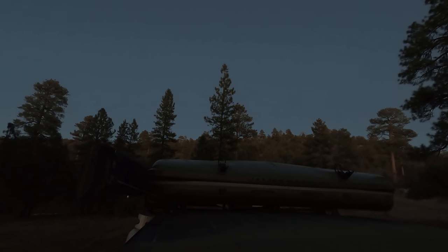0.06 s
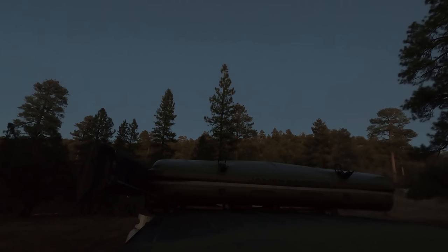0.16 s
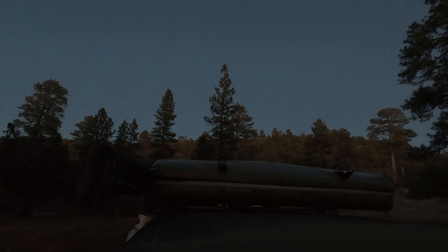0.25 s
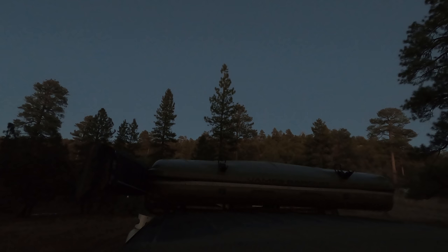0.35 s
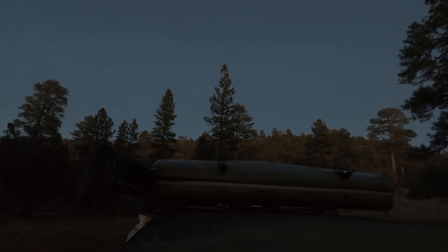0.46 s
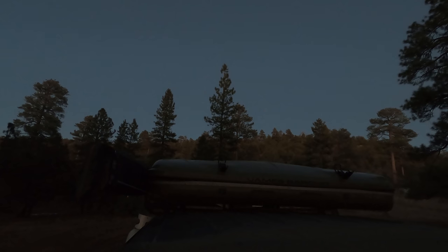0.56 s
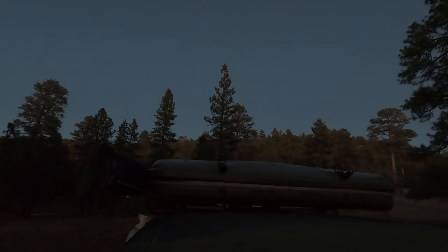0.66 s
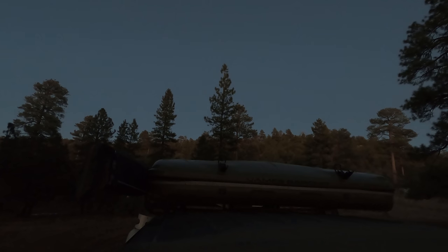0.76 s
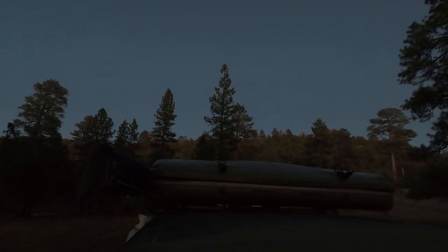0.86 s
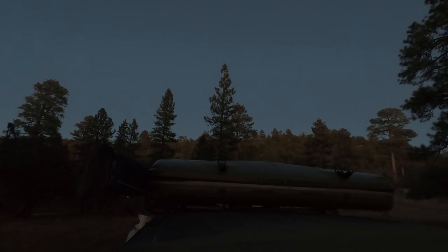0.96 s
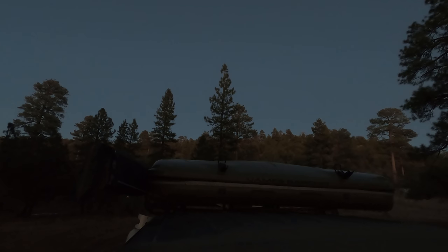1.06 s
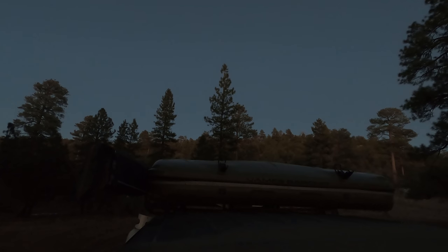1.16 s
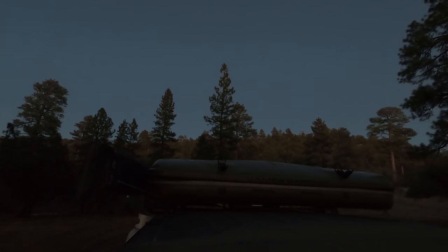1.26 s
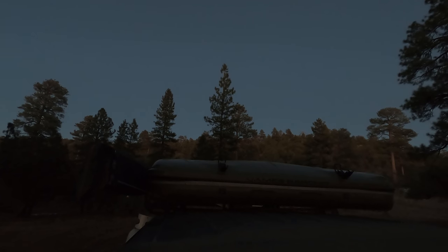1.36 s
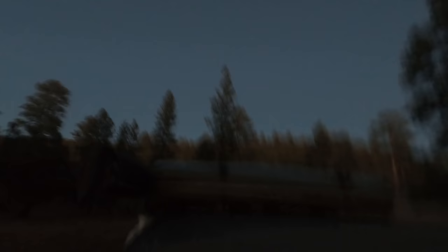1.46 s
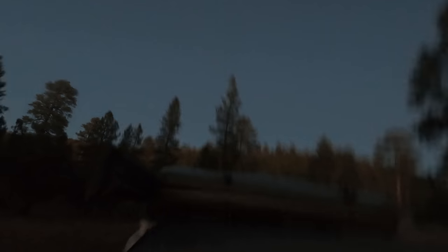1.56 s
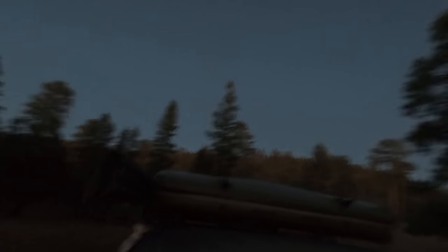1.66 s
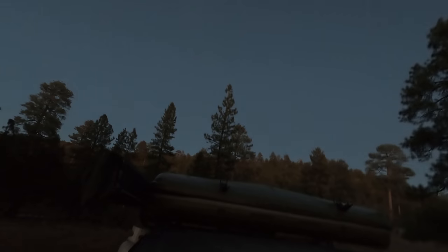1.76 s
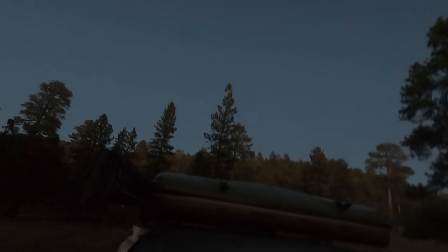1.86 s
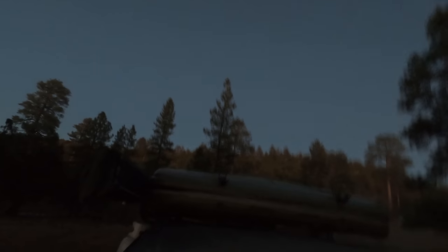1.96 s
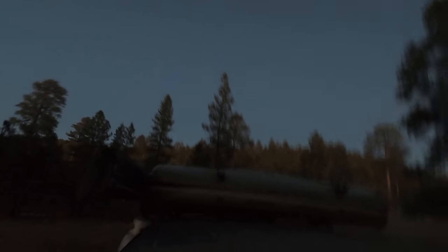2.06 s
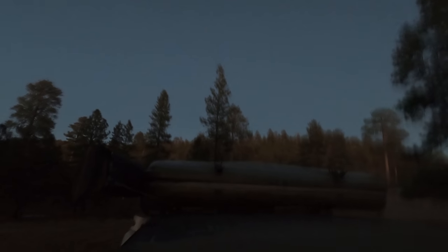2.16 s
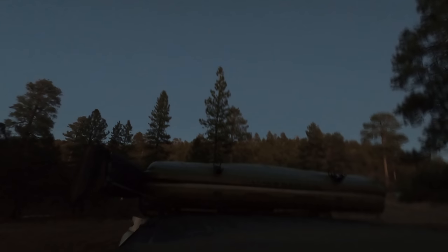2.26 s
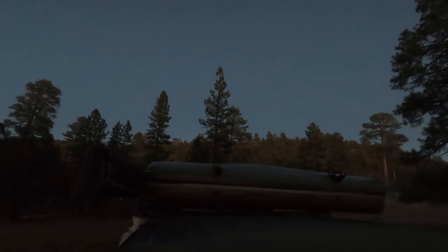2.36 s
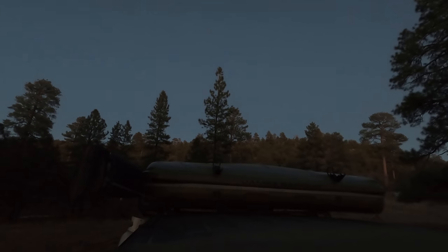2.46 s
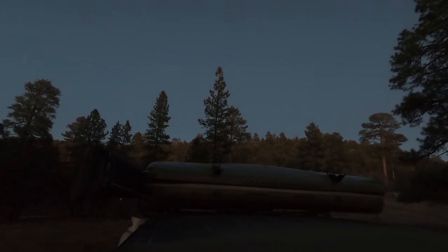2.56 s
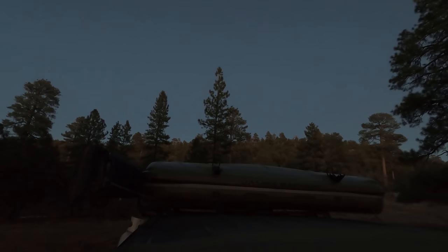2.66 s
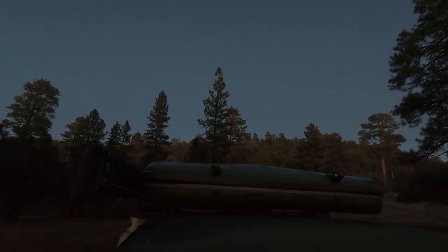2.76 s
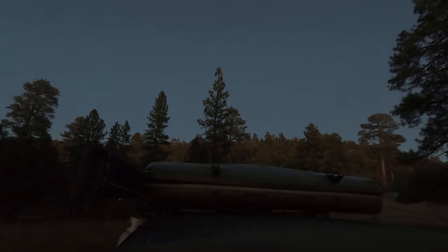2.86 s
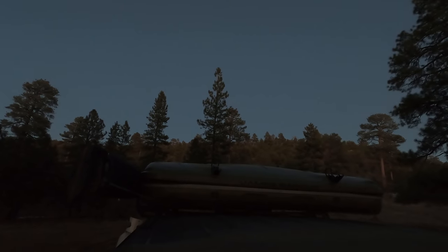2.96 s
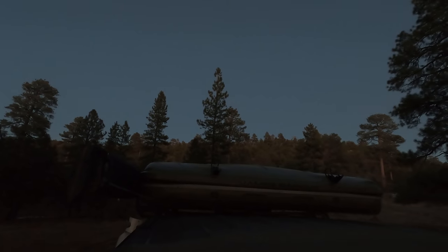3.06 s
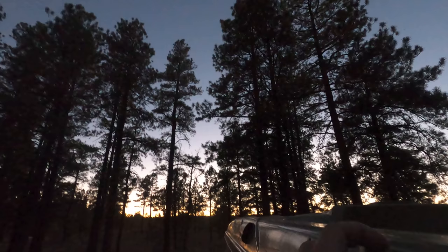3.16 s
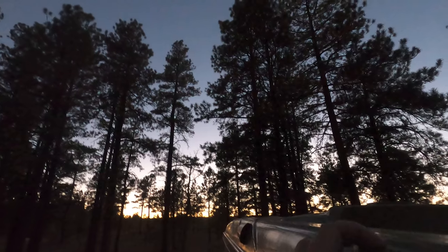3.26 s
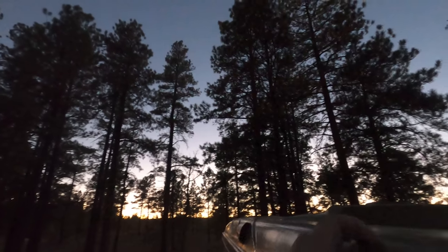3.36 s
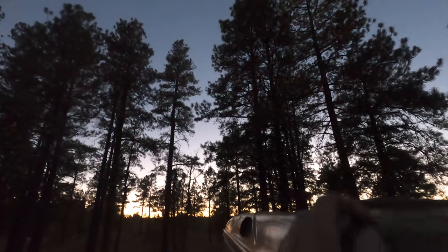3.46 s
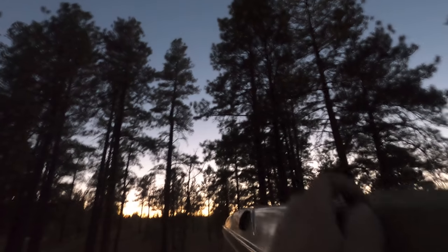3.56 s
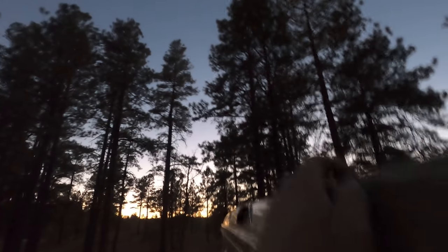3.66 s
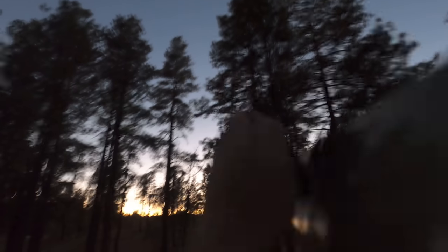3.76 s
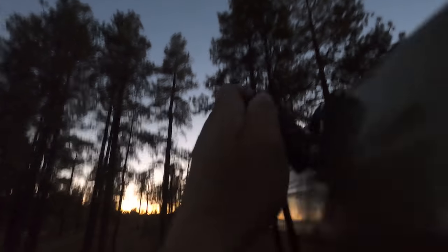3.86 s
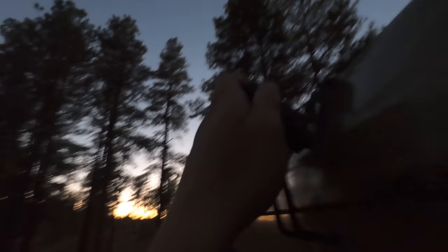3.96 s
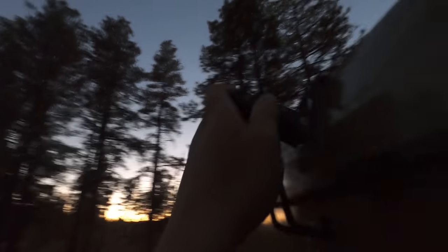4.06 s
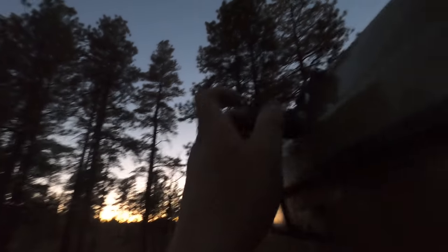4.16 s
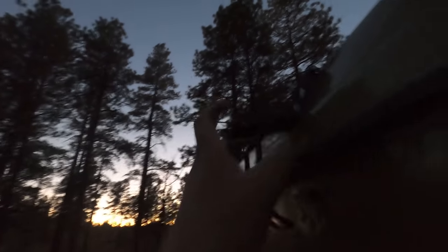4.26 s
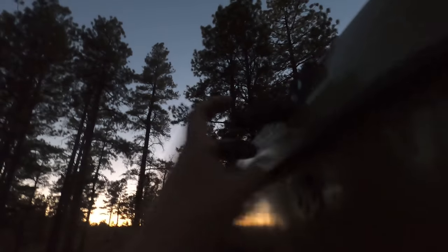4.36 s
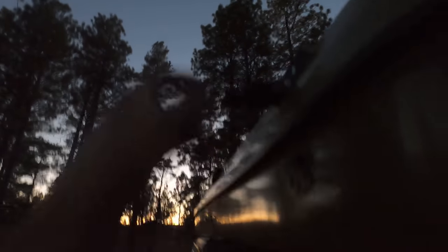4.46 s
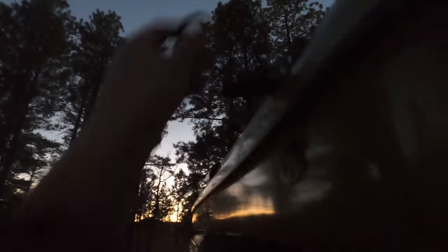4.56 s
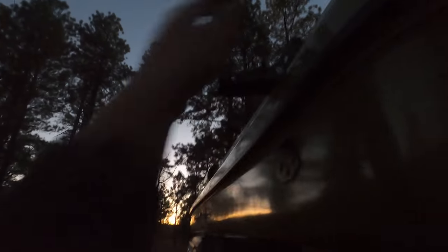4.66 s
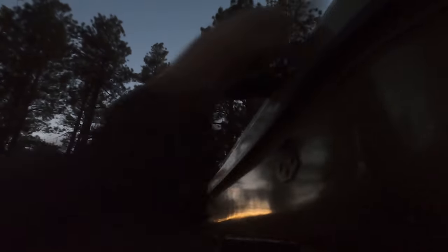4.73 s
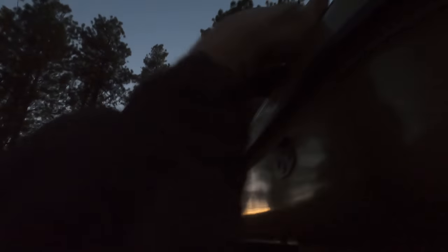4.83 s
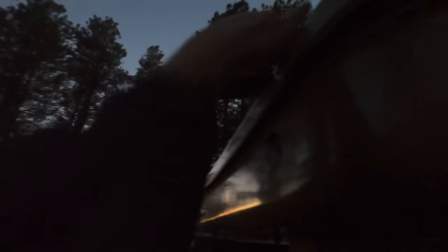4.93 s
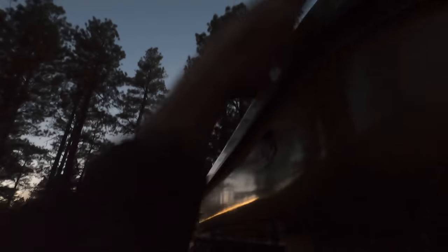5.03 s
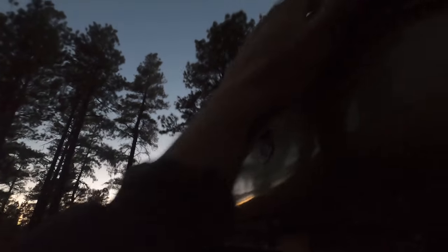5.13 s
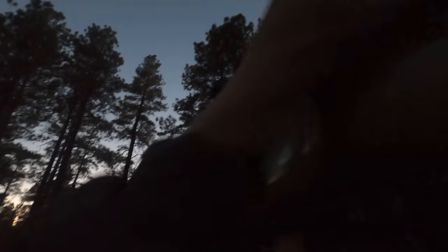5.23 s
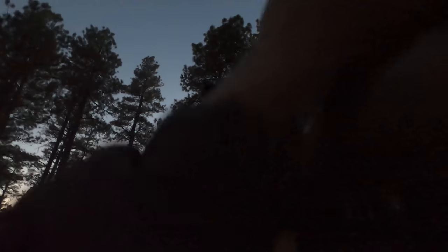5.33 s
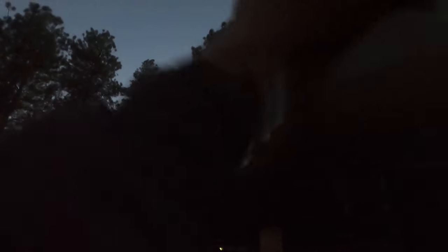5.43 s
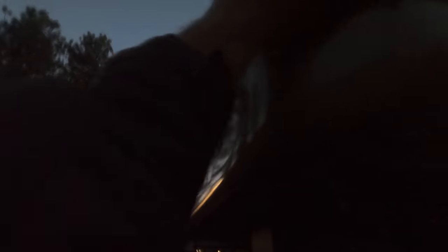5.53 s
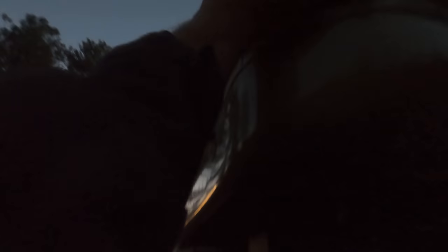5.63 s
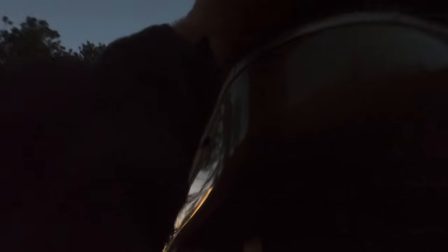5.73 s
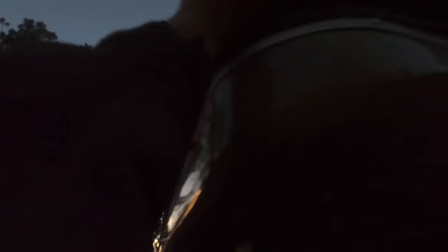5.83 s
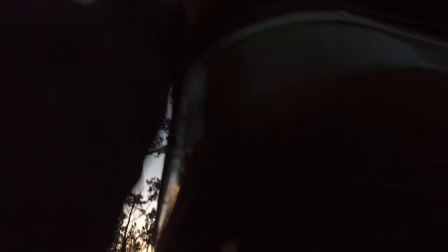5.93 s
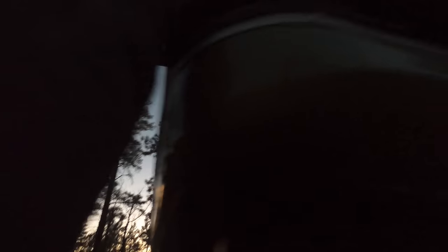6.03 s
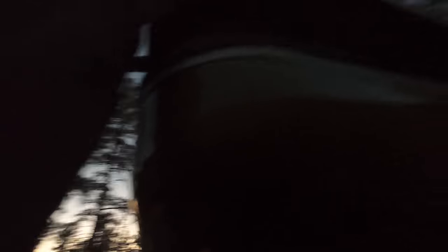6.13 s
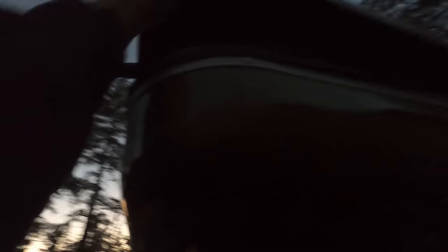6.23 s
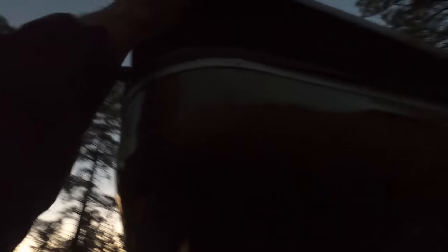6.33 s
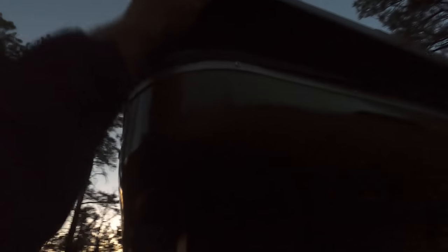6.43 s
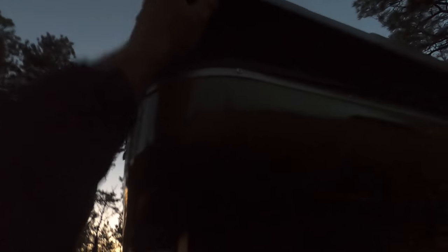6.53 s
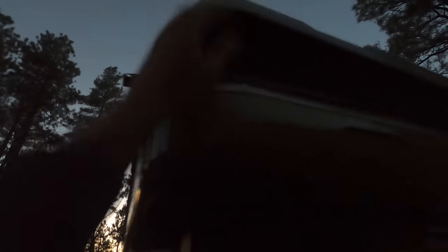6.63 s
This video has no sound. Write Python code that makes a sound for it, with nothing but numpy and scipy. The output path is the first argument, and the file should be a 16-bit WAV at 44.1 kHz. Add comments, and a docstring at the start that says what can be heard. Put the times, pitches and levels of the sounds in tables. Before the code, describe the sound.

First a parked car in a hushed open place: small clicks, a faint soft thud, one big boomy slam that shakes the body, then a few hollow sheet-metal knocks. After a short pause the hand-held microphone is right beside a rooftop tent: dull latch clacks, damped strap twangs, clinking buckles and a bright hard snap, then dry cover cracks, rustling sleeves and low thumps.

```python
"""Car and rooftop tent in a quiet forest

Two scenes. First, by a parked car in faint forest air: filtered noise bursts and damped rings make
a heavy thunk, clanks and knocks. After a moment's silence, hand-held, close and nearly mono by the tent:
cracks with metal rings make a latch and buckles, damped twangs a strap creaking, and grainy noise
the hands and sleeves that rub, stutter and bump along the cover; bright hiss swells briefly."""
import sys
import numpy as np
from scipy import signal
from scipy.fft import rfft, irfft
from scipy.io import wavfile

SR = 44100
rng = np.random.default_rng(int(sys.argv[2]) if len(sys.argv) > 2 else 0)


def generate_wav(sig):
    """Save sig (samples, or channels by samples) to the path in sys.argv[1] as 16-bit PCM at SR."""
    pcm = np.round(np.clip(np.atleast_2d(sig).T, -1, 1) * 32767).astype(np.int16)
    wavfile.write(sys.argv[1], SR, pcm)


N = 295029  # length [samples]
EDGE_HZ = 15900  # upper limit of the sound


def amp(db):
    """Decibels to a linear factor."""
    return 10 ** (np.asarray(db) / 20)


def unit(x):
    """Scales to an rms of 1."""
    return x / np.sqrt(np.mean(x ** 2) + 1e-20)


def peaked(x):
    """Scales to a peak of 1."""
    return x / (abs(x).max() + 1e-12)


def seconds(length):
    """A time axis [s] that starts at 0."""
    return np.arange(round(length * SR)) / SR


def read(points, hz):
    """Reads a table joined by straight lines on a log-frequency axis."""
    f, value = np.transpose(points)
    return np.interp(np.log(hz + 1), np.log(f + 1), value)


def add(mix, s, sound):
    """Adds a sound at s seconds, cut off where the mix ends."""
    part = mix[..., round(s * SR):][..., :sound.shape[-1]]
    part += sound[..., :part.shape[-1]]


def colour(x, points, tilt_db=0):
    """Filters by a spectrum; well above 100 Hz the tilt is in dB per octave."""
    hz = np.fft.rfftfreq(x.shape[-1], 1 / SR)
    gain = amp(read(points, hz) + tilt_db * np.log2(hz / 100 + 1))
    return irfft(rfft(x) * gain, x.shape[-1])


def noise_pair(size, same=.7):
    """Two channels of noise that share part of their power."""
    common, left, right = rng.standard_normal((3, size))
    same = np.clip(same, 0, 1)
    return np.sqrt(same) * common + np.sqrt(1 - same) * np.array([left, right])


def wander(rate):
    """Random values, rate per second, joined by straight lines."""
    at = np.arange(N) * rate / SR
    return np.interp(at, np.arange(N), rng.standard_normal(N))


def swell(start, length, attack, release):
    """Rises to start, holds for length, dies away; attack and release are times for 60 dB."""
    t = np.arange(N) / SR
    before = np.maximum(start - t, 0)
    after = np.maximum(t - start - length, 0)
    return amp(-60 * (before / attack + after / release))


def die_away(x, decays, hold=0, rise=0.00062):
    """A soft start and a hold, then each band fades with its own t60."""
    t, hz = np.arange(x.shape[-1]) / SR, np.fft.rfftfreq(x.shape[-1], 1 / SR)
    centres, t60s = np.transpose(decays)
    spectrum, age = rfft(x), np.maximum(t - hold, 0)
    faded = 0
    for row, t60 in zip(np.eye(len(centres)), t60s):
        share = read(np.c_[centres, row], hz)  # overlapping bands that add up to the whole
        faded = faded + irfft(spectrum * share, len(t)) * amp(-60 * age / t60)
    return np.tanh(t / rise) ** 2 * faded


def ring(t, hz, t60):
    """A sine that fades by 60 dB in t60 seconds."""
    return np.sin(2 * np.pi * hz * t) * np.exp(-np.log(1000) * t / t60)


def struck(hits, modes):
    """Each blow rings the same modes, with other strengths in each channel."""
    out, t = np.zeros((2, N)), seconds(0.81)
    rings = np.array([(-1) ** k * amp(db) * ring(t, hz, t60) for k, (hz, db, t60) in enumerate(modes)])
    for s, db in hits:
        strengths = 1 + .35 * rng.standard_normal((2, len(modes)))
        add(out, s, amp(db) * peaked(strengths @ rings))
    return out


# Spectrum of a hard contact: (frequency [Hz], level [dB])
CRACK_COLOUR = [(300, -13), (1400, -2.5), (3300, 4), (6000, -6), (8300, -5.5), (9300, -16), (11300, -23.5),
                (12200, -15), (14000, -31.5)]


def crack(treble_db, chatter, loose=0.011, loose_db=-22, rise=0.00016):
    """Two hard surfaces meet and chatter: noise with a quick decay over a weak slower one."""
    t = seconds(.5)
    # a treble cut doubles by the upper edge, a boost stays level
    treble = [(5500, 0), (7500, treble_db), (EDGE_HZ, min(treble_db, 2 * treble_db))]
    contact = colour(colour(rng.standard_normal(len(t)), CRACK_COLOUR), treble)
    decay = np.exp(-t / chatter) + amp(loose_db) * np.exp(-t / loose)
    return peaked(contact * decay * (1 - np.exp(-t / rise)))


def dry_cracks(hits, chatter):
    """Contacts that leave no ring."""
    out = np.zeros(N)
    for s, db, treble_db in hits:
        add(out, s, amp(db) * crack(treble_db, chatter))
    return out


def hardware(hits, modes, ring_db, t60, ping_db, ping_hz=8263, ping_t60=0.45):
    """Each contact cracks and rings the metal, a little differently each time; a thin ping stays on."""
    out, t = np.zeros(N), seconds(.5)
    for s, db, treble_db in hits:
        body = np.zeros(len(t))
        for k, (hz, level) in enumerate(modes):
            mode_db = level + treble_db * (hz > 6000) + 2 * rng.standard_normal()
            body += amp(mode_db) * (-1) ** k * ring(t, hz, t60)
        ping = amp(ping_db) * ring(t, ping_hz, ping_t60)
        add(out, s, amp(db) * (crack(treble_db, chatter=0.0028) + amp(ring_db) * peaked(body) + ping))
    return out


def grainy_noise(spectrum, grains_per_s, smooth):
    """Sparse grains of uneven size over smooth noise, filtered: the sound of rough surfaces sliding."""
    grains = (rng.random(N) < grains_per_s / SR) * rng.choice([-1, 1], N) * rng.random(N) ** 2
    return unit(colour(unit(grains) + smooth * rng.standard_normal(N), spectrum))


def catches(low_hz, high_hz, cycles, count):
    """Scattered catches of uneven size, each a short ring at a pitch of its own."""
    out, t = np.zeros(N), seconds(.02)
    for when, pitch, size in rng.random((count, 3)):
        hz = low_hz * (high_hz / low_hz) ** pitch
        add(out, when * N / SR, size ** 2 * np.sqrt(hz) * ring(t, hz, cycles / hz))
    return unit(out)


# Shoves that rock the car on its springs: (start [s], length [s], rumble level [dB])
SHOVES = [(0.017, 0.16, -51), (0.45, 1, -45), (1.517, 0.15, -27), (2.177, 0.13, -37.5)]
SHOVE_ATTACK_S, SHOVE_RELEASE_S = 0.12, 0.92  # times for 60 dB
REST_DB, FOREST_DB = -77.5, -69.5  # rumble of the car at rest; steady air
SHUDDER_DB = -24.5  # the panels' shudder relative to the rocking
# Faint brushes of cloth some way off: (start [s], length [s], rms level [dB])
BRUSHES = [(0.01, 0.06, -68.5), (0.762, 0.16, -70)]
BRUSH_ATTACK_S, BRUSH_RELEASE_S = 1.4, 0.48  # times for 60 dB
# Spectra of the rocking body, of air and shudder, and of the cloth: (frequency [Hz], level [dB])
SWAY_COLOUR = [(12, -31.5), (20, 4.5), (43, 1), (146, -16.5), (1200, -75)]
AIR_COLOUR = [(59, -33.5), (100, -13), (164, 3.5), (275, -11.5), (698, -19.5), (1500, -22), (14000, -53)]
BRUSH_COLOUR = [(200, 3), (7000, -9), (11000, -25)]


def parked():
    """Each shove rocks the body, which settles under faint forest air; cloth brushes some way off."""
    rocking = sum(amp(db) * swell(s, length, SHOVE_ATTACK_S, SHOVE_RELEASE_S) for s, length, db in SHOVES)
    brushing = sum(amp(db) * swell(s, length, BRUSH_ATTACK_S, BRUSH_RELEASE_S) for s, length, db in BRUSHES)
    sway = unit(colour(noise_pair(N, same=0.3), SWAY_COLOUR)) * np.hypot(amp(REST_DB), rocking)
    hiss_level = np.hypot(amp(FOREST_DB), amp(SHUDDER_DB) * rocking)
    hiss = unit(colour(noise_pair(N, same=0.83), AIR_COLOUR)) * hiss_level
    cloth = unit(colour(noise_pair(N, same=0.12), BRUSH_COLOUR)) * brushing
    fade_out = np.interp(np.arange(N) / SR, [3.19, 3.2], [1, 0])
    return (sway + hiss + cloth) * fade_out


# Small ticks: (time [s], peak level [dB])
TICKS = [(0.097, -46.5), (0.261, -55), (0.409, -53), (0.56, -44.5), (0.767, -48), (1.055, -47.5),
         (1.109, -53), (1.346, -49), (1.6162, -20), (1.838, -43.5), (2.04, -55), (2.182, -34.5),
         (2.28, -50.5), (2.322, -38.5), (2.419, -51), (2.607, -56), (2.847, -55.5)]
# Modes that each tick rings: (frequency [Hz], level [dB], t60 [s])
TICK_MODES = [(1010, 11, 0.0073), (1258, 4, 0.0089), (1630, -2.5, 0.022), (2895, -2, 0.01),
              (3290, -6, 0.014), (3880, -3, .007)]


def ticks():
    """Small ticks: a handful of very short rings."""
    return struck(TICKS, TICK_MODES)


# Thuds through the car body: (time [s], level [dB], push length [s], treble tilt [dB per octave])
THUDS = [(1.124, -21, 0.038, -7.5), (1.166, -21, 0.042, -12), (1.506, -5.5, 0.016, 2),
         (1.527, -9, 0.024, 1.9), (1.543, -10, 0.025, 1.3), (1.572, -12, 0.018, 2), (1.61, -18.5, .002, 1),
         (1.633, -27.5, 0.068, 2), (1.676, -23, 0.0061, -1), (1.697, -21.5, 0.08, -7)]
# Spectrum of a thud before its tilt: (frequency [Hz], level [dB])
THUD_COLOUR = [(12, -30.5), (20, -2.5), (165, -11.5), (223, -18.5), (286, -9.5), (337, -22), (536, -20.5),
               (668, -26), (745, -17), (832, -31), (903, -25.5), (4000, -51), (14000, -96)]
# Decay of a thud after its push: (frequency [Hz], t60 [s])
THUD_DECAY = [(40, 0.39), (200, 0.23), (800, 0.17), (5000, 0.054)]
# The body bounces on its springs: (time [s], level [dB], frequency [Hz], t60 [s])
BOUNCES = [(1.199, -22.5, 38.57, 0.34), (1.534, -9.5, 26.6, 0.48)]


def thuds(rise=0.016, rough_db=2):
    """A heavy part lands on its seals in several quick, rattling blows and sets the whole body bouncing."""
    out, t = np.zeros((2, N)), seconds(1)
    for s, db, hold, tilt_db in THUDS:
        shake = die_away(colour(noise_pair(len(t), same=0.58), THUD_COLOUR, tilt_db), THUD_DECAY, hold)
        roughness = amp(rough_db * wander(rate=160)[:len(t)])
        add(out, s, amp(db) * peaked(shake * np.minimum(t / rise, 1) * roughness))
    for s, db, hz, t60 in BOUNCES:
        add(out, s, amp(db) * ring(t, hz, t60))
    return out


# Hollow knocks on the car: (time [s], level [dB], pitch [Hz], t60 [s])
KNOCKS = [(1.129, -41.5, 443, 0.12), (2.1858, -12.5, 180, 0.092), (2.325, -22, 291, 0.035),
          (2.342, -29, 163, 0.036), (2.422, -33.5, 260, 0.033)]
# Spectrum of the rattle in a knock: (frequency [Hz], level [dB])
KNOCK_COLOUR = [(59, -42.5), (110, -16.5), (306, -17.5), (458, -33), (728, -20), (1070, -40.5),
                (1600, -40.5), (11000, -76.5)]


def knocks(rise=0.0055, rattle_db=-6, overtone=1.42, overtone_db=-15):
    """Soft blows on hollow sheet metal: two damped modes with a short rattle of noise."""
    out, t = np.zeros((2, N)), seconds(0.55)
    rattle_decay = [(150, 0.31), (800, 0.073), (5000, 0.15)]  # (frequency [Hz], t60 [s])
    for s, db, hz, t60 in KNOCKS:
        modes = ring(t, hz, t60) + amp(overtone_db) * ring(t, hz * overtone, t60)
        boom = modes * (1 - np.exp(-t / rise))
        rattle = die_away(colour(noise_pair(len(t), same=0.91), KNOCK_COLOUR, tilt_db=-0.6), rattle_decay)
        add(out, s, amp(db) * (peaked(boom) + amp(rattle_db) * peaked(rattle)))
    return out


# Clanks of a panel: (time [s], level [dB])
CLANKS = [(1.5185, -21), (1.549, -20.5), (1.680, -11.5)]
# Modes of the panel: (frequency [Hz], level [dB], t60 [s])
PANEL = [(104.25, 0, 0.59), (260, -6.5, 0.29), (600, -9, 0.12), (651, -5.5, 0.1), (740, -7.5, 0.2),
         (810, -6.5, 0.093), (996, 3, 0.073), (2040, -11, 0.035)]


def clanks():
    """A struck panel rings: low modes last, high ones die at once."""
    return struck(CLANKS, PANEL)


# The trim cracks under the heavy blow: (time [s], peak level [dB], treble [dB])
CRACKS = [(1.5612, -20.5, -10)]


def trim_cracks():
    """The trim cracks with a very short chatter."""
    return dry_cracks(CRACKS, chatter=0.00043)


# Fingers tighten on the camera: (start [s], length [s], rumble level [dB])
GRIPS = [(3.762, 0.066, -32.5), (4.74, 0.3, -37), (5.157, 0.04, -29), (5.437, 0.97, -36),
         (6.47, 0.16, -31.5)]
GRIP_ATTACK_S, GRIP_RELEASE_S = 0.36, 0.64  # times for 60 dB
LOOSE_GRIP_DB, FIRM_GRIP_DB = -55.5, -40.5  # a loose hold; a firmer grip than the second chafes no louder
# Spectra of the grip's rumble and of the chafed casing: (frequency [Hz], level [dB])
GRIP_COLOUR = [(12, -31.5), (21, 2.5), (102, -3.5), (208, -17.5), (700, -73.5)]
CASING_COLOUR = [(700, -43), (1150, -9), (1520, 2), (1900, -3), (3200, -7.5), (4500, -42)]


def fingers(grip_db=-1, casing_db=-22):
    """Each tightening of the grip rumbles in the camera and chafes its casing."""
    squeezes = [amp(db) * swell(s, length, GRIP_ATTACK_S, GRIP_RELEASE_S) for s, length, db in GRIPS]
    grip = np.hypot(amp(LOOSE_GRIP_DB), np.max(squeezes, axis=0))
    rumble = grip * amp(grip_db) * grainy_noise(GRIP_COLOUR, grains_per_s=90, smooth=1.0)
    chafing = np.minimum(grip, amp(FIRM_GRIP_DB)) * amp(casing_db)
    return rumble + chafing * grainy_noise(CASING_COLOUR, grains_per_s=49, smooth=1.5)


EASING_DB_PER_S = 9.5  # the hand eases off during each stroke


def stroke(start, length, attack, release, db, pressure_db, treble_db, brightening):
    """Strengths of rub, rustle and swish in one stroke: pressure brings the low rub, speed the swish."""
    past_middle = np.clip(np.arange(N) / SR - start, 0, length) - length / 2
    rustle = amp(db - EASING_DB_PER_S * past_middle) * swell(start, length, attack, release)
    swish = rustle * amp(treble_db + brightening * past_middle)
    return np.array([rustle * amp(pressure_db), rustle, swish])


# Strokes of hand and sleeve over the cover: (start [s], length [s], attack [s for 60 dB],
# release [s for 60 dB], rustle level [dB], pressure [dB], treble [dB], brightening [dB per s])
STROKES = [(3.51, 0.15, 0.73, 1.5, -51, -5.5, -9.5, 72), (4.21, 0.24, 0.27, 2.85, -56.5, 3, -8.5, -6),
           (4.821, 0.19, 0.95, 0.52, -60.5, -6, -5, -18), (5.375, 0.23, 0.99, 1.5, -66, -19, 7.5, 13),
           (5.488, 0.093, 0.27, 1.6, -41, 7.5, -11.5, 4), (5.767, 0.11, 0.54, 0.99, -45.5, 4, -0.5, -5),
           (6.085, 0.3, 0.14, 0.48, -48, 9.5, -6.5, -7), (6.605, 0.026, 0.12, 0.19, -54.5, 2.5, 1.5, -7)]
IDLE_RUB_DB, IDLE_RUSTLE_DB, IDLE_SWISH_DB = -74, -83, -86.5  # clothing between strokes, before trims
# Spectra of the low rub, the rustle and the bright swish: (frequency [Hz], level [dB])
RUB_COLOUR = [(65, -39), (110, 0), (260, 1), (374, -5.5), (820, -8.5), (1100, -21.5), (1600, -15.5),
              (3300, -100)]
RUSTLE_COLOUR = [(500, -36), (1000, 11.5), (1500, 9), (1830, 0), (2400, 7), (3300, -0.5), (4200, -40)]
SWISH_COLOUR = [(1800, 1.5), (3200, 5.5), (4700, 3), (5700, -1), (6550, -1), (7400, -7.5), (9300, -12.5),
                (14000, -29)]
# A sleeve sings as it slides over the tight cover; attack and release are times for 60 dB
SLEEVE_START_S, SLEEVE_LENGTH_S, SLEEVE_ATTACK_S, SLEEVE_RELEASE_S = 3.45, 0.076, 0.6, 1.2
SLEEVE_DB = -47
# Spectrum of the singing sleeve: (frequency [Hz], level [dB])
SLEEVE_COLOUR = [(1700, -12.5), (2350, -0.5), (2850, 0.5), (3300, -15), (5400, -13.5), (7500, -46)]


def hands(rub_db=4, rustle_db=0, swish_db=6, jerk_db=2.0, drag_db=3.5):
    """Sleeve and cover slide over each other in small jerks while the other hand holds the camera."""
    idle = amp([[IDLE_RUB_DB], [IDLE_RUSTLE_DB], [IDLE_SWISH_DB]])
    rub, rustle, swish = np.sqrt(idle ** 2 + sum(stroke(*row) ** 2 for row in STROKES))
    sleeve = swell(SLEEVE_START_S, SLEEVE_LENGTH_S, SLEEVE_ATTACK_S, SLEEVE_RELEASE_S)
    grabs = grainy_noise(RUB_COLOUR, grains_per_s=260, smooth=0.4)
    weave = catches(low_hz=600, high_hz=4000, cycles=16, count=12000)
    crinkle = unit(colour(weave, RUSTLE_COLOUR, tilt_db=3))
    cloth = rub * amp(rub_db) * grabs
    cloth += rustle * amp(rustle_db + drag_db * wander(rate=35)) * crinkle
    cloth += swish * amp(swish_db) * grainy_noise(SWISH_COLOUR, grains_per_s=400, smooth=2.04)
    cloth += sleeve * amp(SLEEVE_DB) * grainy_noise(SLEEVE_COLOUR, grains_per_s=220, smooth=3.4)
    fade_in = np.interp(np.arange(N) / SR, [3.375, 3.435], [0, 1]) ** 2
    return (fingers() + cloth * amp(jerk_db * wander(rate=64))) * fade_in


# Buckle snaps and clinks: (time [s], level [dB], treble [dB])
SNAPS = [(3.494, -36.5, -6), (3.574, -35, -28), (3.598, -36, -25), (4.2412, -23.5, -10),
         (4.2585, -27.5, -7), (4.298, -41, -21), (4.331, -34, -11), (4.374, -29.5, -14),
         (4.404, -29.5, -19), (4.4948, -38, -6), (4.509, -38, -1), (4.599, -28.5, -0.5),
         (4.6199, -30.5, -7), (4.7645, -27.5, -2), (4.7992, -8, 5.5), (4.8035, -14.5, -4), (4.8092, -9, 7),
         (4.8132, -8, -2), (4.8235, -19.5, -14), (4.852, -35, -5)]
# Modes of the buckle: (frequency [Hz], level [dB])
BUCKLE = [(1335, 2.5), (1560, 3.5), (2248, 3), (2468, 6), (2750, 6), (2945, -0.5), (3147, 7.5),
          (3530, -5.5), (4490, -3), (7800, 3.5), (8000, -5)]


def snaps():
    """A buckle snaps and clinks: hard cracks with a short metal ring."""
    return hardware(SNAPS, BUCKLE, ring_db=-2, t60=0.042, ping_db=-61.5)


# Slips of the taut strap and cover: (time [s], level [dB], pitch [Hz])
SLIPS = [(3.517, -30.5, 865), (4.0452, -22.5, 890), (4.0613, -14, 890), (4.143, -23, 875),
         (4.1566, -18.5, 890), (4.1743, -14, 860), (4.185, -8, 1460), (4.203, -17, 1290),
         (5.4946, -9, 2000), (5.6759, -3.5, 1230)]


def strap(cycles=1.24, fibres_db=-15):
    """Stick and slip: each release is one heavily damped twang and a brief scuff of fibres."""
    out, t = np.zeros(N), seconds(.1)
    fibres = [(500, 1.5), (1600, -2.0), (6000, -18), (12000, -70)]  # (frequency [Hz], level [dB])
    for s, db, hz in SLIPS:
        twang = ring(t, hz, cycles / hz) * t ** 2
        scuff = die_away(colour(rng.standard_normal(len(t)), fibres), [(800, 0.12), (4000, 0.023)])
        add(out, s, amp(db) * (peaked(twang) + amp(fibres_db) * peaked(scuff)))
    return out


# Clacks of a latch: (time [s], level [dB], treble [dB])
CLACKS = [(3.7595, -14, -15), (3.7652, -9, -20), (3.7682, -10, -26), (3.8438, -13, -10)]
# Modes of the latch: (frequency [Hz], level [dB])
LATCH = [(1310, 0), (2030, 1), (2285, 1), (2468, 4.5), (3510, -1), (3885, -2), (5380, 0.5)]


def clacks():
    """A latch clacks: dull cracks with a very short metal ring."""
    return hardware(CLACKS, LATCH, ring_db=-3, t60=0.023, ping_db=-54.5)


# Short swells of bright hiss, one around the buckle snap:
# (time of the loudest moment [s], rms level there [dB], swell time [s])
HISS_SWELLS = [(3.764, -19, 0.0059), (4.802, -28.5, 0.0087), (4.987, -58, 0.0046), (5.585, -35, .005),
               (6.634, -35.5, 0.012)]


def hiss_swells():
    """Bright hiss swells and fades again: grainy noise that rises and falls exponentially."""
    t = np.arange(N) / SR
    level = sum(amp(db) * np.exp(-abs(t - s) / swell_s) for s, db, swell_s in HISS_SWELLS)
    # (frequency [Hz], level [dB])
    hiss_colour = [(600, -14.0), (1400, 11.0), (4000, 9.5), (7500, 1.0), (15000, -24.5)]
    return level * grainy_noise(hiss_colour, grains_per_s=2500, smooth=0.52)


# Bumps against the tent: (time [s], level before trim [dB], pitch [Hz], scrape relative to thump [dB])
BUMPS = [(3.77, -23.5, 115, -9), (3.845, -23, 134, -5), (3.924, -32.5, 320, -3.5), (4.248, -20, 195, -2.5),
         (4.809, -29, 710, 4.5), (4.984, -35.5, 190, -4.5), (5.723, -14, 166, -1),
         (5.8742, -10.5, 235, -3.5), (6.0892, -13, 383, -1.5), (6.151, -16.5, 241, -1),
         (6.2304, -16.5, 218, 0.5), (6.2921, -12.5, 217, 5.5), (6.305, -15.5, 120, 0)]
# Spectrum of the scrape: (frequency [Hz], level [dB])
BUMP_COLOUR = [(47, -35), (80, 1.5), (236, 1), (610, -5.5), (757, -5.5), (1070, -12.5), (1420, -14.5),
               (1800, -17.5), (6290, -28), (14000, -60)]
# Decay of the scrape: (frequency [Hz], t60 [s])
BUMP_DECAY = [(100, 0.47), (500, 0.12), (2000, 0.037), (8000, 0.077)]


def bumps(cycles=7.3, rise=0.0014, bump_db=-1):
    """The padded cover gives a dead thump, and the hand scrapes as it lands."""
    out, t = np.zeros(N), seconds(0.45)
    for s, db, hz, scrape_db in BUMPS:
        thump = -ring(t, hz, cycles / hz) * (1 - np.exp(-t / rise))
        rough = colour(rng.standard_normal(len(t)), BUMP_COLOUR, tilt_db=0.46)
        scrape = die_away(rough, BUMP_DECAY, hold=0.0084)
        add(out, s, amp(db + bump_db) * (peaked(thump) + amp(scrape_db) * peaked(scrape)))
    return out


# Loose fittings rattle: (start [s], length [s], rms level [dB])
RATTLES = [(4.334, 0.038, -44), (4.603, 0.025, -53.5)]


def rattles(attack=0.075, release=0.3):
    """Loose strap fittings chatter in tiny clinks."""
    shaking = sum(amp(db) * swell(s, length, attack, release) for s, length, db in RATTLES)
    return shaking * catches(low_hz=2400, high_hz=7000, cycles=35, count=6000)


# The stiff cover cracks as it is tugged: (time [s], peak level [dB], treble [dB])
FLAPS = [(5.493, -22, -2), (5.675, -16.5, -9), (5.8715, -14.5, -1.5), (5.911, -24.5, 0),
         (5.961, -18.5, 1.5), (5.9925, -22.5, 1.5), (6.151, -16, -2)]


def flaps():
    """The stiff cover cracks dryly, with a longer chatter than the trim."""
    return dry_cracks(FLAPS, chatter=0.0036)


# Stutters over the cover:
# (start [s], length [s], peak level [dB], grab rate [per s], centre [Hz], rasp relative to pluck [dB])
JUDDERS = [(5.588, .12, -19.5, 107.4, 456, -19.5), (5.7227, .03, -9, 158, 560, -26),
           (6.104, .04, -21, 109, 4770, -2)]


def judders(grab_s=0.005, skirt_db=-36):
    """A hand or a strap stutters over the tight cover: uneven grabs, each a pluck and a short rasp."""
    out, t = np.zeros(N), seconds(.2)
    for s, length, db, rate, hz, rasp_db in JUDDERS:
        grabs = np.zeros(len(t))
        for at in np.arange(.5 / rate, length, 1 / rate):
            rasp = amp(rasp_db) * rng.standard_normal(len(t)) * np.exp(-t / grab_s)
            pluck = -1.0 * (t == 0)  # a single-sample impulse
            add(grabs, at + rng.uniform(-.25, .25) / rate, rng.uniform(.5, 1) * (rasp + pluck))
        band = [(hz / 10, skirt_db), (hz / 2, 0), (hz * np.sqrt(2), 0),
                (hz * np.pi, skirt_db), (hz * 10, 2 * skirt_db)]
        add(out, s, amp(db) * peaked(colour(grabs, band)))
    return out


# Stereo spread of the tent: (frequency [Hz], side level [dB])
SIDE_LEVEL = [(700, -74.5), (8000, -22), (10500, -17.5), (12500, -5.5)]


def scene():
    """The car's blows are heard a little to the right; the tent is straight ahead and close."""
    # left and right gains [dB]
    car = (thuds() + knocks()) * amp([[-2], [1.5]]) + clanks() * amp([[-10], [4]])
    left, right = parked() + ticks() + car + trim_cracks()
    tent = hands() + snaps() + strap() + clacks() + hiss_swells() + bumps() + rattles() + flaps() + judders()
    mid = (left + right) / 2 + tent
    side = colour((right - left) / 2, [(40, -9.5), (90, 1.0)])  # the deepest bass is narrower
    side += colour(tent, SIDE_LEVEL)  # by the tent the highest treble leans to the right
    return np.array([mid - side, mid + side])


def record(dry):
    """A steep low-pass filter limits the band at EDGE_HZ."""
    low_pass = signal.firwin(511, EDGE_HZ, window=("kaiser", 9), fs=SR)
    return signal.oaconvolve(dry, low_pass[None], "same")


dry = scene()
out = record(dry)
generate_wav(out)
```